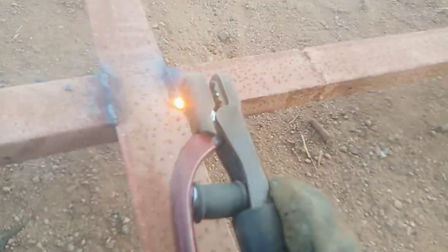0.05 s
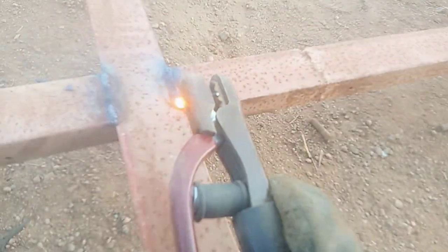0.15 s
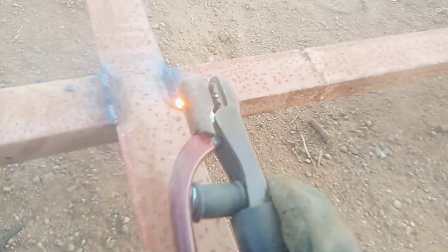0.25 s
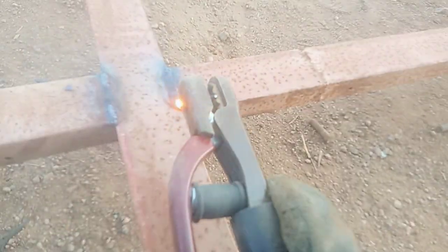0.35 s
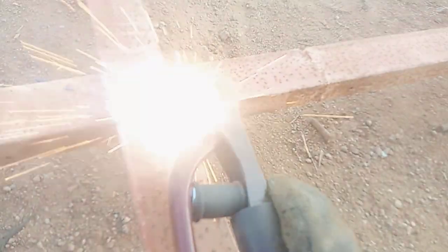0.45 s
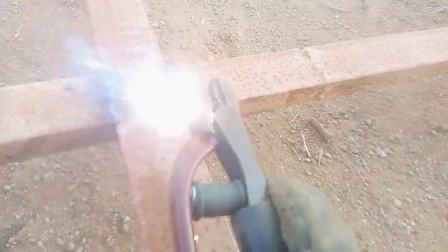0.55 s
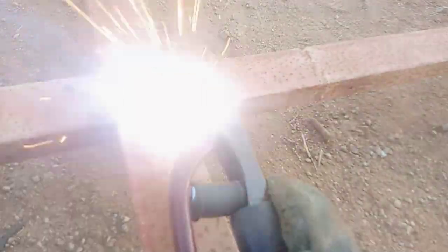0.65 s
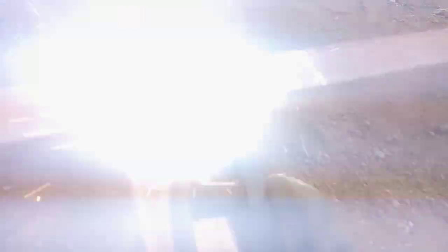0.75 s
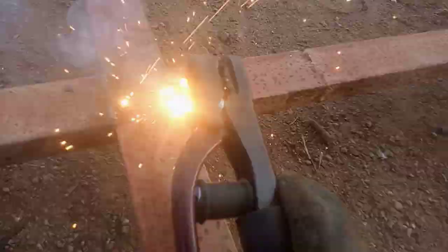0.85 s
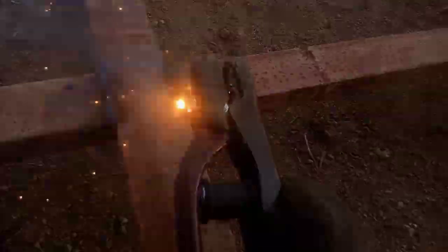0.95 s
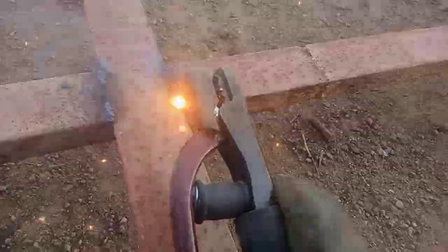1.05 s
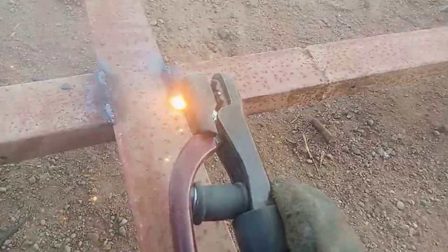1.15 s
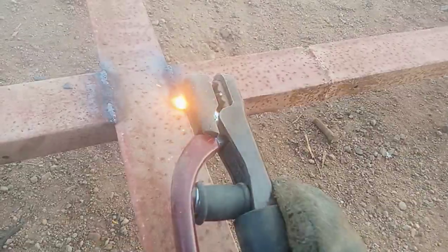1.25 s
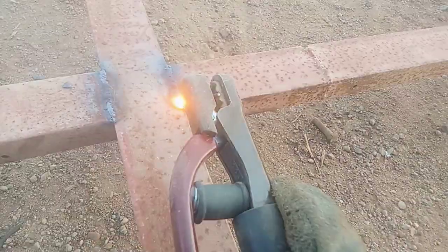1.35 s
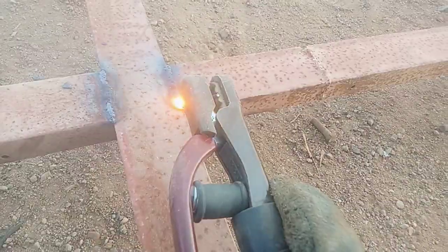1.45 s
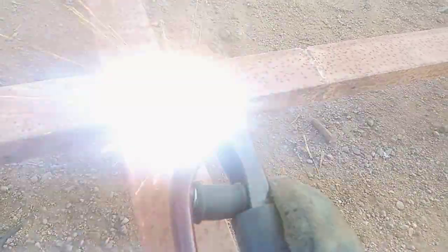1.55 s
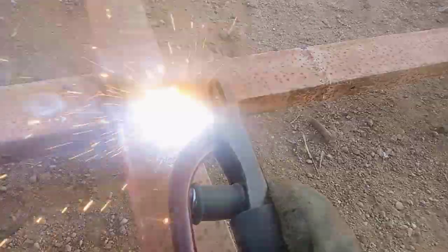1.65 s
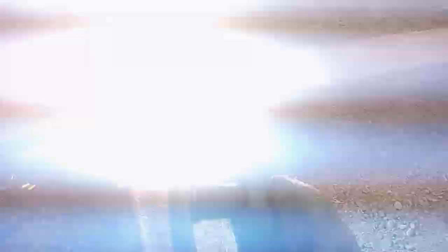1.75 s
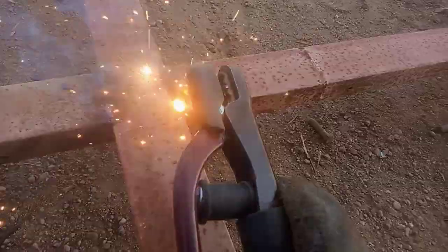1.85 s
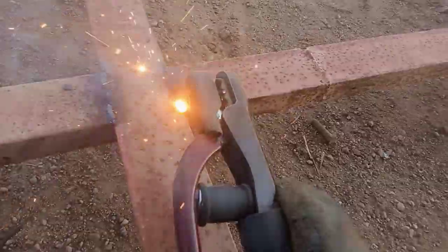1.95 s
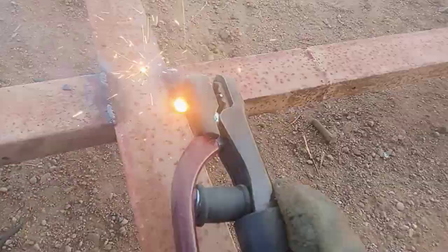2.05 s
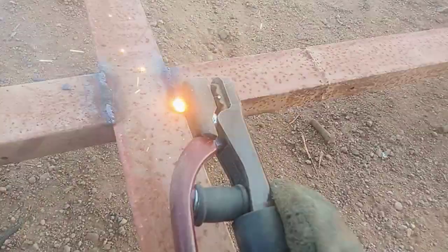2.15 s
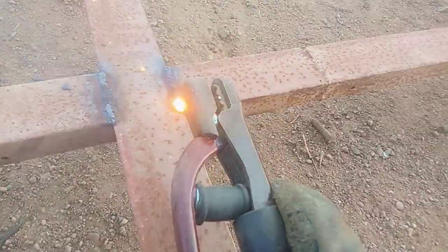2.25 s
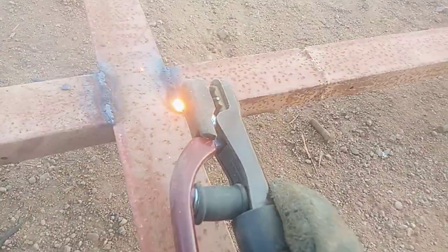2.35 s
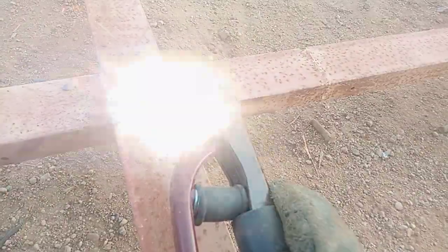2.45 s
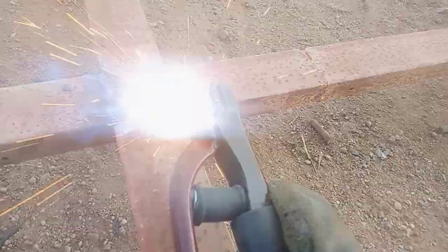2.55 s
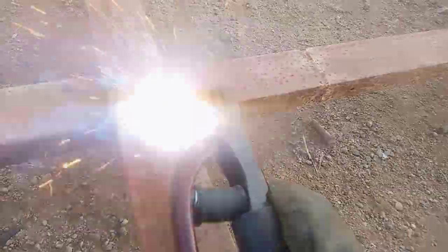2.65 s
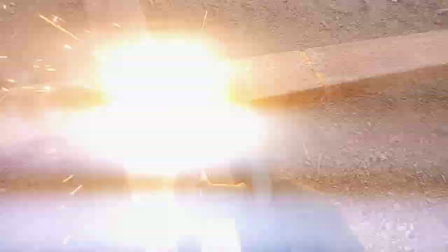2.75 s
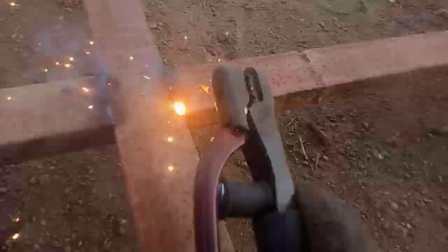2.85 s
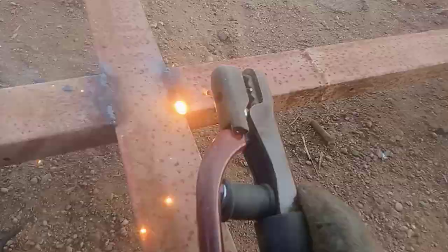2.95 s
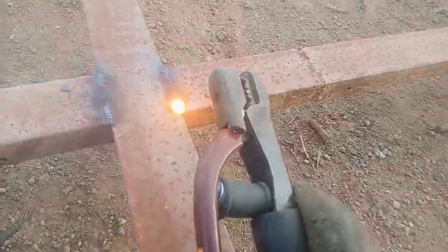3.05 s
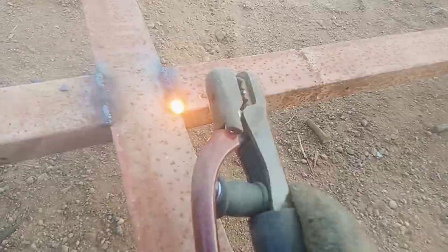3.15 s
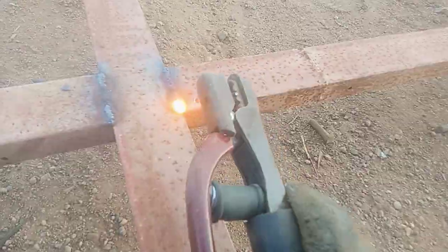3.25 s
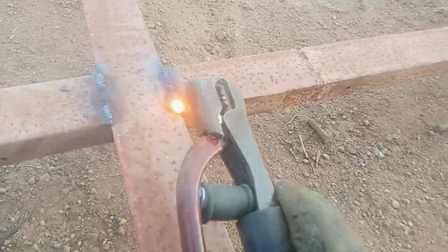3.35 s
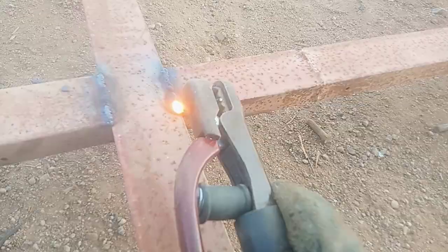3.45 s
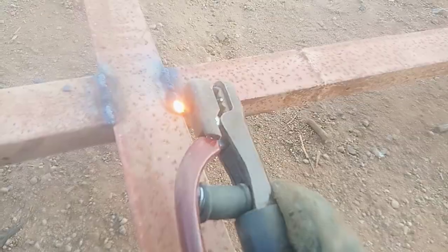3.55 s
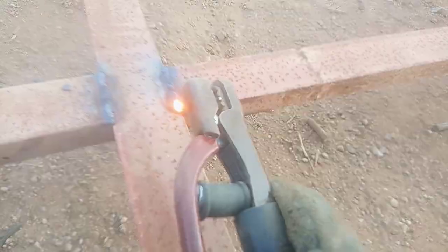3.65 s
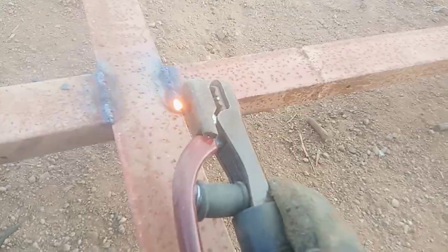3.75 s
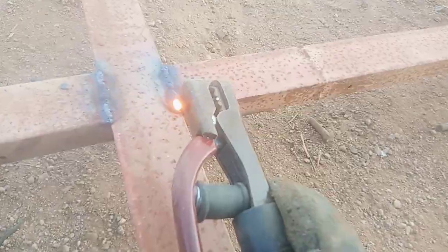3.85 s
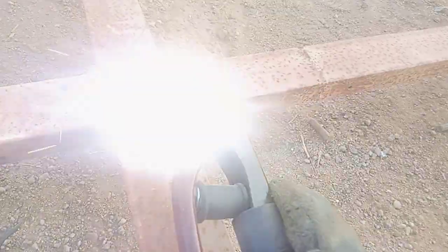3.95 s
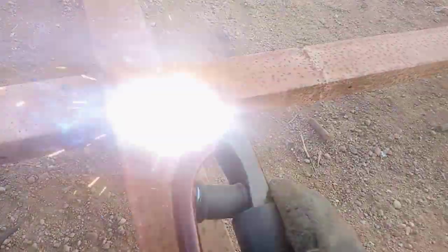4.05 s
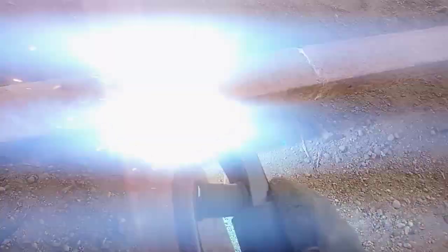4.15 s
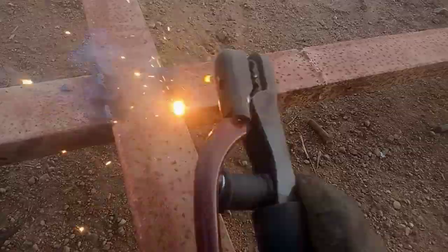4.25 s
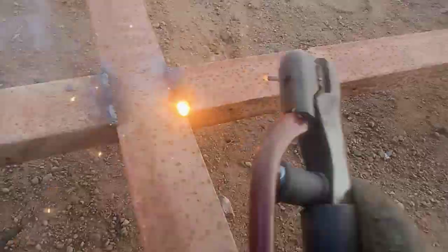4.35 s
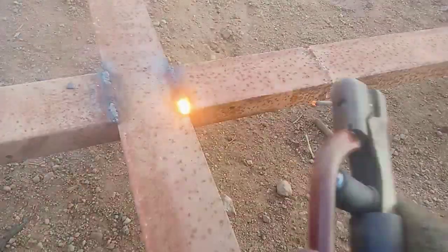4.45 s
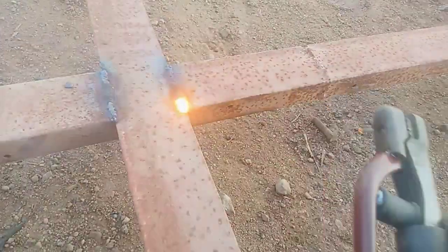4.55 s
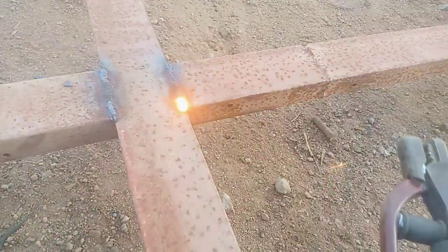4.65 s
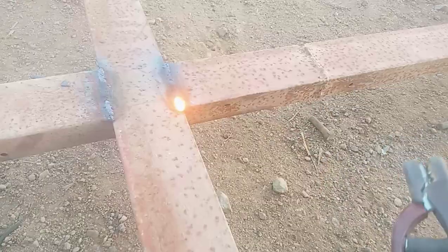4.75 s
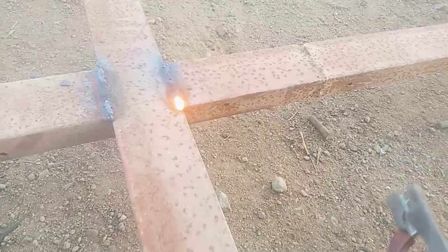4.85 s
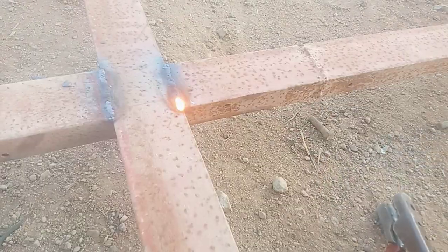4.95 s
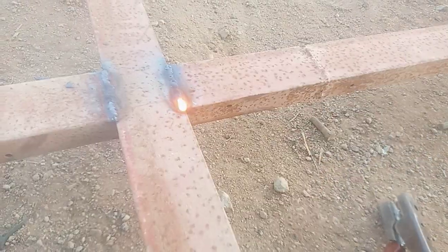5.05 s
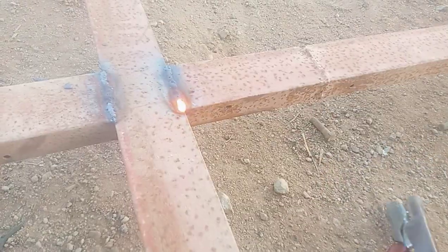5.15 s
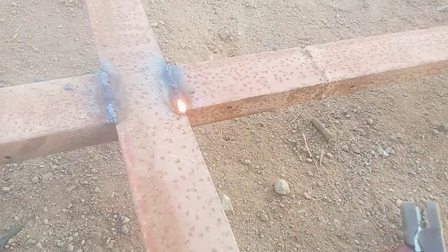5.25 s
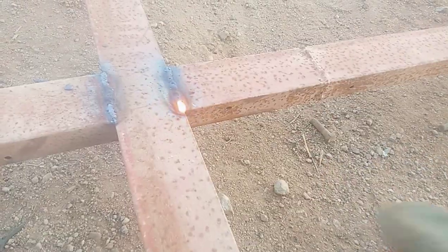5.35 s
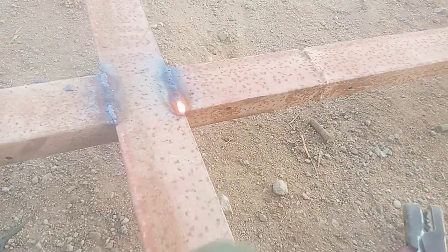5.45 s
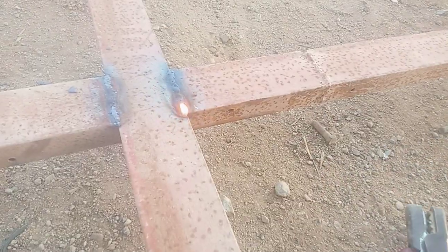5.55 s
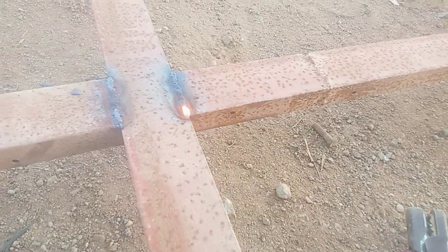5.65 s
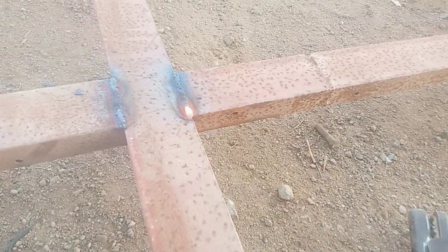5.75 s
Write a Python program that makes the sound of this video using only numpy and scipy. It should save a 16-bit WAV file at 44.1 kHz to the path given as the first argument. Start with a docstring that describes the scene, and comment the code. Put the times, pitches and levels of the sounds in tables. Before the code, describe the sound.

A stick welder strikes four short arcs on steel tubing, close to the microphone in an outdoor yard. The bursts run from about 0.5 to 0.9 seconds, 1.5 to 1.9, 2.5 to 2.8 and 3.9 to 4.3. Each is a loud, fluttering sizzle with sharp snaps, soft low puffs and an electric hum that swells as the arc starts and breaks, leaving a faint ringing echo.

Everything else is much quieter. Sparrows chirp throughout, near and far, more busily after 3 seconds. A hen clucks softly in the first half second, again from 3.2 to 3.9, and from 4.6 to 5.6. A glove and cable make small gritty scuffs on the ground between 1 and 2 seconds and from 4.7 onward, clustering around 5.7. Underneath lie a faint transformer buzz, a distant engine's low rumble and a soft outdoor hiss.

```python
"""A stick welder on mains current strikes four short arcs on steel tube, close by in a yard.
The plasma flares at each crest of the current, so the arc sizzles and hums at twice the mains frequency;
drops of metal short it with a snap, and recoiling gas gives low puffs. A resonant microphone port colours
the crackle and the walls return it. Sparrows chirp, a hen clucks, and a glove and cable scuff the ground
over the buzz of the welder's transformer, a far engine and the murmur of the yard."""
import sys
import numpy as np
from scipy import signal
from scipy.fft import rfft, irfft
from scipy.io import wavfile
from scipy.ndimage import uniform_filter1d

SR = 44100
rng = np.random.default_rng(int(sys.argv[2]) if len(sys.argv) > 2 else 0)


def pcm_store(signal):
    """Save signal as 16-bit PCM."""
    levels = np.round(np.clip(np.atleast_2d(signal), -1, 1) * 32767)
    wavfile.write(sys.argv[1], SR, levels.astype(np.int16).T)


N = 254898
TIME = np.arange(N) / SR
HALF_CYCLE_HZ = 119.925  # twice the mains frequency


def undb(db):
    """Amplitude ratio of a level in decibels."""
    return 10 ** (np.asarray(db) / 20)

def unit(x):
    """Normalisation to an rms of 1."""
    return x / np.sqrt(np.mean(x ** 2))

def contour(points):
    """Linear interpolation of (time, value) points over the scene."""
    return np.interp(TIME, *np.transpose(points))

def band(x, lo_hz, hi_hz, order=2):
    """Butterworth band-pass filter."""
    return signal.sosfilt(signal.butter(order, [lo_hz, hi_hz], "band", fs=SR, output="sos"), x)

def noise_band(lo_hz, hi_hz, order=2):
    """Band-limited Gaussian noise with an rms of 1."""
    return unit(band(rng.standard_normal(N), lo_hz, hi_hz, order))

def colour(x, points, size=4096):
    """Minimum-phase filter through (Hz, dB) points, built by folding the cepstrum."""
    hz, db = np.transpose(points)
    bin_hz = np.arange(size // 2 + 1) * SR / size + 1
    gain = undb(np.interp(np.log(bin_hz), np.log(hz), db))
    cepstrum = irfft(np.log(gain))
    cepstrum[1:size // 2] *= 2
    cepstrum[size // 2 + 1:] = 0
    return signal.fftconvolve(x, irfft(np.exp(rfft(cepstrum))))[:N]

def wander(rate_hz):
    """Random modulation: straight ramps between Gaussian values, with a spread near 1."""
    step = int(SR / rate_hz)
    return uniform_filter1d(np.repeat(rng.standard_normal(N // step + 1), step), step)[:N]

def reverberation(x, t60_s):
    """Diffuse reflection: dense echoes from the yard's walls decay exponentially."""
    age = np.arange(int(SR * 1.2)) / SR
    echoes = rng.standard_normal(len(age)) * 1000 ** (-age / t60_s) * np.clip(age / .004, 0, 1)
    return signal.fftconvolve(x, echoes / np.sqrt(np.sum(echoes ** 2)))[:N]

def glide(hz, db, harmonics=((1, 0),)):
    """Frequency modulation: phase is the integral of pitch; the rounded envelope peaks early."""
    phase = 2 * np.pi * np.cumsum(hz) / SR
    envelope = np.sin(np.pi * np.linspace(0, 1, len(hz)) ** .76) ** .42
    return undb(db) * envelope * sum(undb(gain_db) * np.sin(k * phase) for k, gain_db in harmonics)

def impulses(times_s, db):
    """Ideal pressure impulses, each one sample long."""
    out = np.zeros(N)
    out[(times_s * SR).astype(int)] = undb(db)
    return out


# Each row: time in seconds, level of the engine in dB.
ENGINE_LEVEL = [(0, -55.5), (1.2, -60), (2.6, -61.5), (3.5, -54), (4.3, -55.5), (5.4, -51)]

def far_engine(hz=79.7):
    """Narrow-band noise: a far engine is heard as a low pitch of unsteady amplitude."""
    return noise_band(hz - 6, hz + 6) * undb(contour(ENGINE_LEVEL))

# Each row: frequency in Hz, relative spectral density of the yard's noise in dB.
YARD_SPECTRUM = [(30, -10), (60, -8.5), (80, -3.5), (110, 0), (250, -1), (450, -18.5), (650, -15),
                 (850, -20), (1500, -13), (2500, -11.5), (3500, -11), (4600, -24), (6500, -43),
                 (8000, -77.5), (16000, -63.5)]
# Each row: time in seconds, level of the hiss in dB.
HISS_LEVEL = [(0, -43), (.2, -52), (.46, -54.5), (.95, -47), (1.4, -47), (2.15, -49.5), (2.48, -53),
              (2.9, -45.5), (3.3, -53), (3.77, -52.5), (3.9, -47), (4.32, -44.5), (4.74, -50.5),
              (5.12, -48), (5.4, -48), (5.62, -43)]

def yard():
    """Ambient noise: rumble, engine, murmur and hiss fluctuate independently and add in power."""
    low, mid, upper, high = (colour(rng.standard_normal(N), YARD_SPECTRUM) for _ in range(4))
    rumble = unit(band(low, 20, 300, order=1)) * undb(-51.5 + 2 * wander(6))
    engine = far_engine()
    murmur = band(mid, 300, 680, order=4) * undb(4 * wander(7))
    murmur += band(upper, 930, 1750, order=4) * undb(2.5 * wander(7))
    hiss = unit(band(high, 1700, 18000, order=1)) * undb(contour(HISS_LEVEL) + 1.5 * wander(20))
    return rumble + engine + undb(-55) * unit(murmur) + hiss

def far_flock(count=110, samples=1800):
    """Reverberant field: distant sparrows call at random and are heard only through their echoes."""
    calls = np.zeros(N)
    for when, pitch, bend, distance in rng.random((count, 4)):
        hz = (2231 + 2522 * pitch) * (1 + .5 * (bend - .3) * np.linspace(-1, 1, samples))
        start = int(when * (N - samples))
        calls[start:start + samples] += glide(hz, -44.95 - 10 * distance)
    return reverberation(calls, t60_s=.88)

# Each row: multiple of the half-cycle rate, rms level in dB.
CORE_HARMONICS = [(4, -70), (6, -67.5), (13, -63.5)]

def transformer():
    """Forced vibration: the core buzzes at harmonics of the half-cycle rate, each wavering in level."""
    return sum(np.sqrt(2) * undb(db + 2 * wander(24)) * np.sin(2 * np.pi * k * HALF_CYCLE_HZ * TIME)
               for k, db in CORE_HARMONICS)

# Each row: start in seconds, initial level before filtering in dB, pitch in Hz.
GROUND_SCUFFS = [(1.034, -36.5, 2520), (1.301, -34, 2440), (1.969, -37, 3000), (3.785, -48, 7000),
                 (4.717, -48, 4960), (4.925, -47, 5480), (4.94, -29.5, 4640), (4.959, -42, 5000),
                 (5.246, -38, 5500), (5.3, -52, 6500), (5.373, -52, 5000), (5.433, -33.5, 5000),
                 (5.646, -29, 2800), (5.654, -29, 2250), (5.676, -25.5, 2550), (5.69, -33.5, 1780),
                 (5.705, -35, 3200), (5.73, -25, 2850), (5.741, -28, 2800), (5.739, -39.5, 475),
                 (5.761, -38, 2500)]

def scuffs(samples=4000, cycles_to_fade=210):
    """Friction noise: glove and cable rub the ground in gritty bursts that decay exponentially."""
    out = np.zeros(N)
    shape = (len(GROUND_SCUFFS), samples)
    grits = rng.standard_normal(shape) * undb(3.5 * np.minimum(rng.exponential(size=shape), 5))
    age = np.arange(samples) / SR
    for (start_s, db, hz), grit in zip(GROUND_SCUFFS, grits):
        start = int(start_s * SR)
        burst = unit(band(grit, hz / 1.7, hz * 1.5)) * 1000 ** (-age * hz / cycles_to_fade)
        out[start:start + samples] += undb(db) * burst[:N - start]
    # little treble passes the microphone port
    return colour(out, [(100, 9.5), (6000, -8.5), (8000, -37.5), (12000, -14), (17000, -27)])

# Each row: start in seconds, highest pitch in Hz, level in dB.
HEN_CLUCKS = [(.063, 712, -44), (.2, 642, -47.5), (.327, 653, -45), (.461, 623, -47), (3.173, 647, -53),
              (3.294, 601, -55), (3.434, 650, -58), (3.576, 588, -58), (3.72, 627, -49), (3.873, 667, -48),
              (4.566, 669, -49), (4.707, 642, -45.5), (4.854, 593, -45), (5.0, 623, -47), (5.141, 629, -46),
              (5.283, 636, -46), (5.418, 639, -45), (5.557, 754, -41)]
# Each row: harmonic number, gain of the hen's throat in dB.
HEN_HARMONICS = [(1, -3.5), (2, -2.5), (3, 0.5), (4, -4), (5, -10)]

def hen(rasp, waver, cluck_s=.0536):
    """Source and filter: the throat weights the harmonics of a pitch that arches over each cluck."""
    out = np.zeros(N)
    progress = np.linspace(0, 1, int(cluck_s * SR))
    for start_s, top_hz, db in HEN_CLUCKS:
        at = int(start_s * SR) + np.arange(len(progress))
        hz = top_hz * (1 - .5 * (progress - .52) ** 2 + .02 * waver[at])
        out[at] += glide(hz, db, HEN_HARMONICS) * (1 + .6 * rasp[at])
    return out

# Each row: start in seconds, length in seconds, first and last pitch in Hz, relative level in dB,
# distance from 0 (near) to 1 (far).
SPARROW_CHIRPS = [(0, .063, 3295, 3870, -52.5, 0.68), (0.026, 0.03, 5070, 4980, -51, .07),
                  (0.048, 0.028, 5100, 6150, -53, 0.18), (0.112, 0.024, 3050, 4370, -39.5, 0),
                  (.139, 0.027, 3260, 5100, -49, 0), (0.582, 0.015, 5800, 5600, -48, 0.45),
                  (1.028, 0.015, 3410, 3830, -41, 0.15), (1.039, 0.029, 5050, 5000, -56, .05),
                  (1.043, 0.017, 6050, 5900, -59, 0.13), (1.14, .025, 5100, 5100, -58, .05),
                  (1.376, 0.028, 4650, 5870, -58, .3), (1.122, 0.027, 3380, 4490, -41, 0.17),
                  (1.446, 0.022, 3560, 4200, -44, 0.3), (1.468, 0.036, 3750, 5400, -53, 0.98),
                  (1.507, .03, 3610, 4100, -46, .5), (1.51, 0.033, 4990, 5600, -52, .3),
                  (2.061, 0.021, 3580, 4150, -47, 0.43), (2.155, 0.042, 2590, 3930, -37.5, 0.65),
                  (2.171, .05, 5500, 4130, -54.5, 0.22), (2.265, 0.025, 3500, 4740, -40.5, 0.28),
                  (2.27, .044, 4560, 4320, -56, 0), (2.893, 0.059, 2850, 5950, -58, 0.44),
                  (2.963, 0.029, 3500, 5260, -51.5, 0.1), (2.996, 0.027, 5200, 3900, -51, 0.26),
                  (2.99, .022, 6100, 5300, -59.5, 0), (3.051, 0.036, 2870, 4530, -45.5, 0),
                  (3.162, 0.054, 3225, 3910, -52, 1), (3.217, 0.052, 2442, 2190, -46.5, 0.83),
                  (3.238, 0.053, 2700, 2920, -44, 0.37), (3.401, 0.059, 2166, 3990, -40, 0.63),
                  (3.46, 0.053, 3670, 2860, -45, 0.75), (3.55, 0.044, 3514, 4130, -47, .57),
                  (3.596, 0.044, 4980, 5340, -45, 0), (3.603, 0.033, 5900, 6000, -58, 0),
                  (3.626, 0.029, 5600, 3005, -46, 0.23), (3.692, 0.032, 3470, 4340, -40, 0.04),
                  (3.827, 0.0615, 2485, 3635, -51.5, 0.65), (4.292, 0.064, 4270, 4320, -55, .5),
                  (4.498, 0.092, 3674, 3530, -56.5, 0.85), (4.56, 0.024, 3550, 5180, -50, 0.2),
                  (4.627, 0.028, 5170, 4000, -53, .2), (4.628, 0.024, 6000, 5500, -61.5, 0.07),
                  (4.703, 0.023, 3070, 4500, -44, 0), (4.729, 0.021, 4480, 4200, -45, 0),
                  (4.851, .03, 2405, 4100, -41, 0.42), (4.874, 0.041, 4040, 4170, -49, 0.57),
                  (4.909, 0.06, 4166, 2407, -34, 0.4), (5.102, 0.043, 3170, 3590, -42.5, 0.3),
                  (5.198, 0.031, 3360, 3810, -41, 0.29), (5.208, 0.035, 5680, 5360, -54.5, 0.07),
                  (5.288, 0.021, 2880, 4570, -40, 0.28), (5.376, 0.039, 2577, 4340, -33, 0.44),
                  (5.428, 0.017, 3500, 3460, -46, 0.67)]

def sparrows(rasp, waver, arch_per_s=1.1, gain_db=3):
    """Modulated whistles, as direct sound and sound bound for the walls; far ones rasp and echo more."""
    direct, to_walls = np.zeros(N), np.zeros(N)
    for start_s, length_s, first_hz, last_hz, db, distance in SPARROW_CHIRPS:
        progress = np.linspace(0, 1, int(length_s * SR))
        at = int(start_s * SR) + np.arange(len(progress))
        arch = 1 + arch_per_s * length_s * (1 - (2 * progress - 1) ** 2)
        hz = (first_hz + (last_hz - first_hz) * progress) * arch
        hz *= 1 + (.012 + .035 * distance) * waver[at]
        call = glide(hz, db + gain_db) * (1 + .6 * (1 + distance) * rasp[at])
        direct[at] += (1 - .5 * distance) * call
        to_walls[at] += (.043 + 1.15 * distance) * call
    return direct, to_walls

def birds():
    """Direct and reverberant sound: the sparrows echo off the walls, the hen only faintly."""
    rasp, waver = wander(500), wander(250)
    chirps, to_walls = sparrows(rasp, waver)
    clucks = hen(rasp, waver)
    return chirps + clucks + undb(6) * reverberation(to_walls + .033 * clucks, t60_s=.45)

# Each row: time in seconds, approximate peak level in dB.
GAS_PUFFS = [(0.5358, -20), (.6709, -25), (.774, -33), (1.544, -38), (1.6105, -13), (1.6352, -12.5),
             (1.677, -12.5), (1.699, -19), (1.817, -34), (2.535, -12.5), (2.6521, -20), (2.7113, -22),
             (2.7526, -19), (4.0294, -14), (4.1353, -10), (4.1709, -26), (4.2392, -26)]

def gas_puffs(makeup_db=33.5):
    """Impulse response of a low band: each burst of gas recoils with a slow thump."""
    return undb(makeup_db) * band(impulses(*np.transpose(GAS_PUFFS)), 130, 207, order=1)

# Each row: time in seconds, relative level of the crack in dB, relative level of the thud in dB.
DROP_SHORTS = [(0.4905, -15, -11), (.4996, 0.5, -13), (0.516, -18, -15), (0.5353, 0.5, -18),
               (0.5446, -10, -41), (0.5523, -11, -30), (.606, -16, -22), (.617, -8, -25),
               (0.6258, -6.5, -12.5), (0.6337, -2, -20), (0.6525, -11, -44), (.6709, 2.5, -12),
               (.6832, -9, -40), (.7017, -1, -15), (0.7449, -4.5, -25), (0.7583, -3, -31),
               (0.7651, -4.5, -24), (.774, 0.5, -27), (.7842, -20, -18), (.7937, -24, -23),
               (0.8106, 0.5, -17), (.834, -5, -11), (0.841, -3.5, -15), (0.8666, -17, -8.5),
               (1.5423, -31, -7), (1.5578, -13, -34), (1.567, -3, -31), (1.5764, -7.5, -37),
               (1.6103, 2, -18), (1.6358, -0.5, -19), (1.643, -3.5, -11), (1.677, 0.5, -21),
               (1.701, 0, -34), (1.7112, 2, -21), (1.736, 1, -31), (1.7507, -31, -14), (1.7832, -3, -39),
               (1.799, -4, -40), (1.8077, -6, -24), (1.8166, -2, -9.5), (2.5177, -7, -14),
               (2.5257, -28, -5), (2.5343, -4, -2.5), (2.5422, -10, -18), (2.5538, 2, -13),
               (2.5785, -5.5, -22), (2.5863, -16, -12.5), (2.592, 3.5, -10), (2.618, -5, -30),
               (2.6522, -1.5, -30), (2.6662, -11, -37), (2.6783, -3.5, -35), (2.706, -10, -26),
               (2.7117, -5.5, -40), (2.7182, -3.5, -34), (2.753, 1, -36), (2.771, -7.5, -35),
               (2.7849, -5, -16), (2.7932, -14, -17), (2.8028, -5, -7), (3.9426, -40, -10.5),
               (3.9519, 1, -10), (3.985, 1.5, -12), (3.9934, -5.5, -29), (4.0281, 2.5, -17),
               (4.039, -10, -44), (4.0638, -9, -13), (4.1361, 0.5, -32), (4.1521, -7, -30),
               (4.1707, 1, -20), (4.1939, 0, -31), (4.2395, -34, -21)]

def snaps(crack_gain_db=12.5, thud_gain_db=28):
    """Impulsive excitation: a drop shorts the arc with a broadband crack and a hollow thud."""
    times_s, crack_db, thud_db = np.transpose(DROP_SHORTS)
    crack = impulses(times_s, crack_db + crack_gain_db)
    thud = band(impulses(times_s, thud_db + thud_gain_db), 680, 1450)
    return -(crack + thud)

# Each row: strike in seconds, break in seconds, hum at the strike in dB, hum before the break in dB,
# seconds before the break at which the rod pulls away.
WELD_RUNS = [(.488, .9, -27.5, -22, .045), (1.54, 1.861, -24.5, -24.5, .045),
             (2.507, 2.832, -24.5, -24.5, .05), (3.941, 4.277, -31, -25, .032)]
# Each row: time the arc dies in seconds, time it relights in seconds.
ARC_DROPOUTS = [(0.557, .605), (2.634, 2.651)]
# Each row: time in seconds, level of the sizzle in dB.
SIZZLE_LEVEL = [(.488, -17), (.52, -33.5), (.556, -15.5), (.62, -27), (.667, -31.5), (.707, -23),
                (.769, -19), (.813, -19.5), (.887, -34.5), (.905, -64), (1.54, -14), (1.59, -31),
                (1.69, -24), (1.726, -27.5), (1.8, -22), (1.834, -25.5), (1.865, -69), (2.506, -25.5),
                (2.572, -29.5), (2.636, -25), (2.685, -19), (2.733, -27), (2.775, -18.5), (2.813, -27.5),
                (2.84, -51), (3.942, -25.5), (4.0, -24.5), (4.036, -36), (4.06, -19.5), (4.138, -27),
                (4.174, -27.5), (4.24, -20.5), (4.278, -45)]

def arc_envelopes(burn_db=-47.5):
    """Gating: sizzle and hum need a lit arc; the hum swells at the strike and as the rod pulls away."""
    lit, hum_level = np.zeros(N), np.zeros(N)
    for strike_s, break_s, strike_db, break_db, lead_s in WELD_RUNS:
        at = (TIME >= strike_s) & (TIME < break_s)
        lit[at] = 1
        strike = undb(strike_db) * np.exp(-((TIME[at] - strike_s - .011) / .02) ** 2)
        pull_away = undb(break_db) / (1 + np.exp((break_s - lead_s - TIME[at]) / .013))
        hum_level[at] = undb(burn_db) + strike + pull_away
    for out_s, relit_s in ARC_DROPOUTS:
        lit[(TIME >= out_s) & (TIME < relit_s)] = 0
    return uniform_filter1d([lit * undb(contour(SIZZLE_LEVEL)), lit * hum_level], size=128)

def far_echoes(db=-46.5, t60_s=2.22, frame_hz=851):
    """Reverberant decay: each weld's echoes, with the steel frame's ring, fade after the break."""
    level = sum((TIME > strike_s) * undb(db - 60 * np.maximum(TIME - break_s, 0) / t60_s)
                for strike_s, break_s, *_ in WELD_RUNS)
    ring = undb(-3) * noise_band(frame_hz - 40, frame_hz + 40)
    wash = noise_band(413, 1184, order=3) * undb(2.3 * wander(12))
    return level * (wash + ring)

# Each row: multiple of the half-cycle rate, relative level in dB.
HUM_HARMONICS = [(1, 4.5), (2, 0), (3, -6), (4, -17.5)]

def arc_hum(level, lag_turns=.43):
    """Harmonic series: the arc pulses once every half cycle, wavering in phase and level."""
    phase = 2 * np.pi * (HALF_CYCLE_HZ * TIME - lag_turns)
    tone = unit(sum(undb(db) * np.cos(k * (phase + .6 * wander(25))) for k, db in HUM_HARMONICS))
    return level * undb(2 * wander(60)) * tone

def arc_crackle(sizzle_level, hum_level, lag_turns=.16):
    """Amplitude-modulated noise: the plasma flares at each current crest with a random strength."""
    turns = HALF_CYCLE_HZ * TIME - lag_turns + .07 * wander(100)
    nearest_crest = np.floor(turns + .5).astype(int) + 1
    strengths = undb(2.5 * rng.standard_normal(int(turns[-1]) + 3))
    flare = unit(strengths[nearest_crest] * (.2 + np.cos(np.pi * turns) ** 4))
    spit = undb(4 * np.minimum(rng.exponential(size=N), 6))
    sizzle = sizzle_level * unit(spit * rng.standard_normal(N))
    flutter_level = undb(-12) * sizzle_level + undb(.5) * np.sqrt(np.abs(hum_level * sizzle_level))
    return flare * (sizzle + flutter_level * noise_band(367, 1274))

# Each row: frequency in Hz, gain of the air path and microphone port in dB.
PORT_RESPONSE = [(60, -20), (150, -1), (400, -6), (510, -22), (900, -4), (1500, -2.5), (2250, 0.5),
                 (2410, -9), (2720, 13), (3020, 2), (3400, 10.5), (4400, 0.5), (5200, -13.5), (6300, -16),
                 (7500, -30), (9500, -44.5), (13000, -29), (17000, -50.5)]

def microphone_port(x, resonance_hz=3000, pole_radius=.75):
    """Resonance and group delay: the port holds back its band, so a crack swells over a cycle or two."""
    cosine = np.cos(2 * np.pi * resonance_hz / SR)
    denominator = [1, -2 * pole_radius * cosine, pole_radius ** 2]
    delayed = signal.lfilter(denominator[::-1], denominator, x)  # all-pass
    return colour(delayed, PORT_RESPONSE)

def scene(ground_delay_s=.0016):
    """Superposition: the arc, its reflections from ground and walls, and the sounds of the yard."""
    sizzle_level, hum_level = arc_envelopes()
    direct = arc_crackle(sizzle_level, hum_level) + snaps()
    off_ground = undb(-12) * np.roll(direct, int(ground_delay_s * SR))
    welding = microphone_port(direct + off_ground) + arc_hum(hum_level) + gas_puffs()
    off_walls = undb(-22) * reverberation(welding, t60_s=.45)
    background = transformer() + birds() + scuffs() + yard() + far_echoes() + far_flock()
    return (welding + off_walls + background)[None]

def record(dry, low_hz=50, top_hz=16400):
    """Limited range and bandwidth: the microphone hisses, sheds deep bass, clips and cuts the top."""
    noisy = dry + undb(-87) * rng.standard_normal(N)
    high_pass = signal.butter(3, low_hz, "high", fs=SR, output="sos")
    low_pass = signal.ellip(8, .2, 70, top_hz, fs=SR, output="sos")
    clipped = np.clip(signal.sosfilt(high_pass, noisy), -1, 1)
    return signal.sosfilt(low_pass, clipped)


dry = scene()
out = record(dry)
pcm_store(out)
```